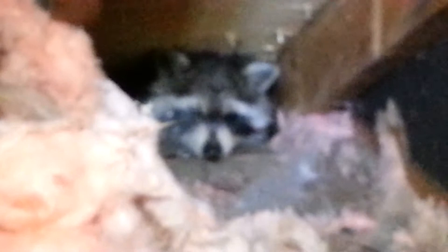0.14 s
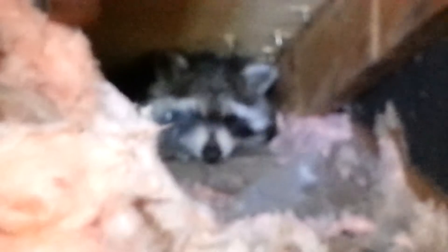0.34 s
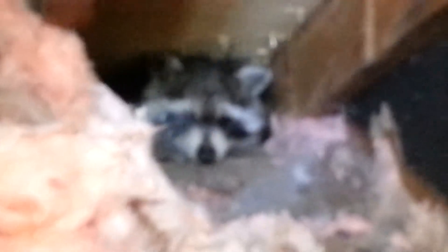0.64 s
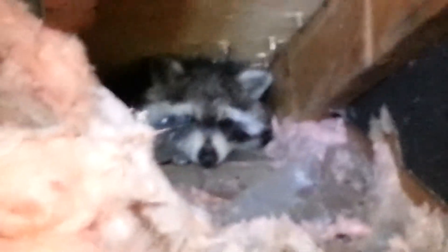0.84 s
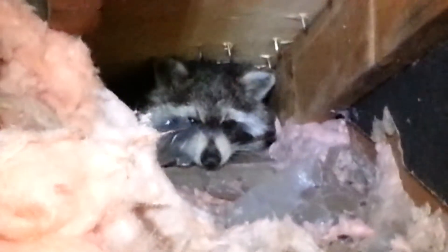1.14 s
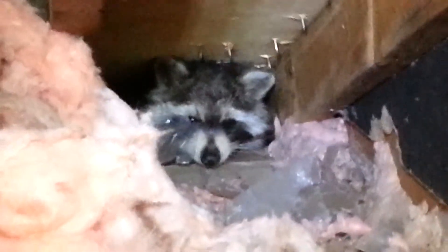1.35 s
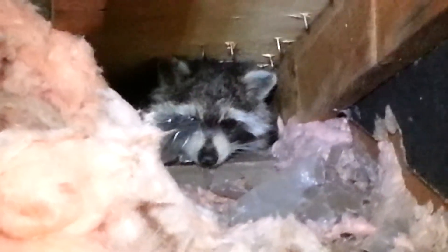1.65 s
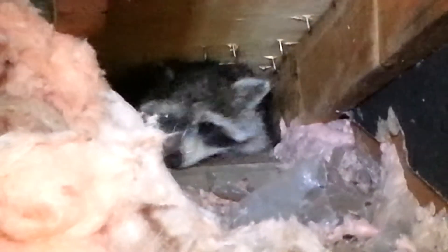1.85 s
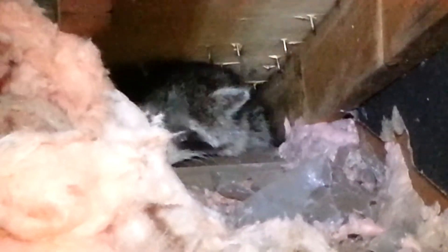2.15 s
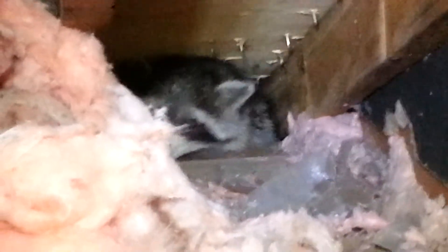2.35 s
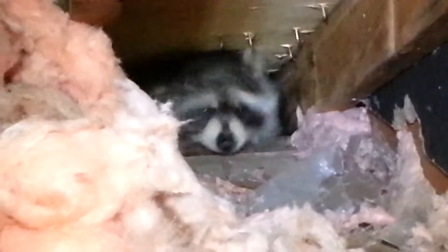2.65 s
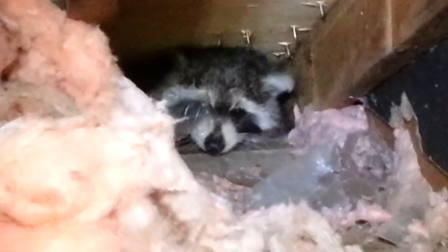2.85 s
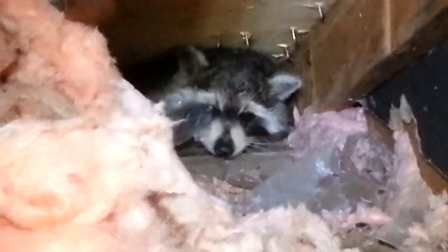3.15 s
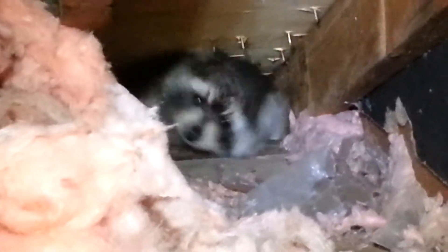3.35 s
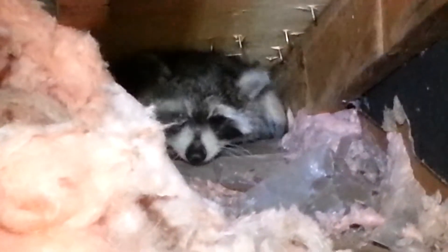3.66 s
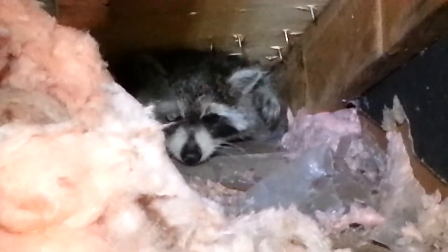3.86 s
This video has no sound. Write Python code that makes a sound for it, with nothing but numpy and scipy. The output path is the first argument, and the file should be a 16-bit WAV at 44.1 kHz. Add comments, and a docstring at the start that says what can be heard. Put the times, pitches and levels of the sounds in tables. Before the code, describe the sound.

Raccoon chittering in raspy rolling bursts, with thin wavering squeals and a few sharp wood snaps

```python
"""Young raccoons in an attic nook

One raccoon gives five rough, trilled chitter calls: fold pulses through throat resonances.
Another squeals thinly between them, a wavering whistle with overtones.
Wood snaps sharply close by (clicks with bright rattles); insulation rustles (grainy treble noise).
The house hums low under a faint hiss, both shaped noise.
Two microphone ports, the right one nearer the nest.
"""
import sys
import numpy as np
from scipy import signal
from scipy.fft import rfft, irfft, next_fast_len
from scipy.io import wavfile
from scipy.ndimage import map_coordinates

SR = 44100
rng = np.random.default_rng(int(sys.argv[2]) if len(sys.argv) > 2 else 0)


def pcm_store(signal):
    """Save signal as 16-bit PCM."""
    levels = np.round(np.clip(np.atleast_2d(signal), -1, 1) * 32767)
    wavfile.write(sys.argv[1], SR, levels.astype(np.int16).T)


N = 176400  # samples: 4 s


def amp(db):
    """Amplitude factor of a level in dB."""
    return 10 ** (np.asarray(db) / 20)


def unit(x):
    """x scaled to rms 1."""
    return x / np.sqrt(np.mean(x ** 2) + 1e-20)


def along(points, hz):
    """Read a table of (f/Hz, value) on a log frequency axis."""
    f, value = np.transpose(points)
    return np.interp(np.log(hz + 1), np.log(f + 1), value)


def curves(rows):
    """One value per sample for each column after the time."""
    s, *columns = np.transpose(rows)
    return [np.interp(np.arange(N) / SR, s, column) for column in columns]


def during(rows, fade):
    """1 within the time span of a table, fading at its ends."""
    t = np.arange(N) / SR
    return np.clip(np.minimum(t - rows[0][0], rows[-1][0] - t) / fade, 0, 1)


def wobble(rate):
    """A smooth random curve with rate knots a second."""
    knots = rng.standard_normal(int(N * rate / SR) + 4)
    return map_coordinates(knots, [np.arange(N) * rate / SR])


def filtered(x, response):
    """x through a complex response of frequency, padded against wrap-around."""
    m = next_fast_len(N + SR // 2)
    return irfft(rfft(x, m) * response(np.fft.rfftfreq(m, 1 / SR)), m)[..., :N]


# Throat resonances: f/Hz, width/Hz, level/dB
THROAT = [(448, 126, -1), (922, 180, -2.5), (1283, 95, 5.5), (1937, 255, 4), (2774, 450, -2),
          (3304, 327, 0), (3957, 590, -16.5), (7160, 980, -28.5)]
# Mouth opening, one row per call: boost under 1050 Hz/dB, boost over 2900 Hz/dB
MOUTH = [(-4, 0), (-6.5, -1), (-5.5, -1), (-1.5, -1), (-3, 2.5)]
JAW_RATE, JAW_SHIFT = 25.084, 0.025  # knots/s; shift of the resonances each way, as a fraction
CHEST_DB = 3.5  # flicker of the lowest resonances
# Between these levels, softer syllables keep more of their rasp (exponent BRIGHTEN)
LOUD_DB, SOFT_DB, BRIGHTEN = -38, -52, .6
# Chitter syllables, one table per call; pitch and roughness before the bends, level before the swell:
# start t/s, end t/s, level/dB, pitch f/Hz, roughness/0-1
CHITTER_CALLS = [
    [(.19, .247, -45, 662, 0.66), (.272, .303, -41.5, 887.4, 0.23), (.337, .374, -39.5, 889, 0.34),
     (.394, .44, -39, 886, 0.25), (.474, .565, -43, 651.5, 0.49), (.574, .619, -38.5, 670.4, 0.65),
     (.628, .675, -40, 638, 0.29), (.68, .702, -37, 445, 0.01)],
    [(.85, .945, -53.5, 522.3, 0.78), (.955, 1.004, -37, 541.4, 0.35), (1.033, 1.064, -40, 497.2, 0.87),
     (1.108, 1.138, -32.5, 632, 0.27), (1.168, 1.225, -34, 658, 0.6), (1.231, 1.287, -35, 642.7, 0.33),
     (1.295, 1.372, -36, 640.7, 0.32), (1.385, 1.452, -32.5, 675, 0.32), (1.465, 1.523, -39, 610, .15)],
    [(1.56, 1.675, -54, 549, 0.91), (1.79, 1.872, -43.5, 599.5, .7), (1.903, 1.94, -36, 609.4, 0.52),
     (1.965, 2.008, -36, 562.4, 0.56), (2.04, 2.092, -37.5, 567.6, 0.64), (2.112, 2.195, -37, 646, 0.38),
     (2.205, 2.25, -35.5, 607.5, 0.23), (2.258, 2.365, -40, 616, 0.72), (2.385, 2.436, -39.5, 654, 0.5),
     (2.452, 2.489, -41, 610, .12)],
    [(2.808, 2.838, -49.5, 543, 0.32), (2.862, 2.922, -39.5, 596, 0.48), (2.932, 2.966, -37.5, 535, 0.3),
     (2.99, 3.035, -38, 628.4, 0.42), (3.06, 3.122, -36, 590.3, 0.33), (3.132, 3.28, -40.5, 624.8, 0.64),
     (3.29, 3.332, -44, 522.5, 0.37)],
    [(3.43, 3.47, -52.5, 579, 0.63), (3.58, 3.63, -38.5, 522.6, 0.67), (3.645, 3.82, -47.5, 572.8, 0.74)],
]


def ring(f, low_hz, high_hz):
    """Complex response of the throat resonances centred in a band, with alternating sign."""
    total = 0
    for k, (centre, width, db) in enumerate(THROAT):
        if low_hz < centre < high_hz:
            damping = 1j * f * width
            total = total + (-1) ** k * amp(db) * damping / (centre * centre - f * f + damping)
    return total


def throat(f):
    """Three bands of throat response, thinned below 300 Hz."""
    bands = np.array([ring(f, 0, 1050), ring(f, 1050, 2900), ring(f, 2900, SR)])
    return f ** 3 / (f ** 3 + 300 ** 3) * bands


def chitter():
    """The folds sound through the throat, whose resonances slide as the jaw moves."""
    calls = [syllables(rows) for rows in CHITTER_CALLS]
    gains, pitches, roughs = np.transpose(calls, (1, 0, 2))
    call, now = gains.argmax(axis=0), np.arange(N)  # the strongest call rules each moment
    source = folds(pitches[call, now], roughs[call, now])
    jaw = (1 + np.tanh(wobble(JAW_RATE))) / 2  # 0 shut, 1 wide
    shut = filtered(source, lambda f: throat(f * (1 + JAW_SHIFT)))
    wide = filtered(source, lambda f: throat(f * (1 - JAW_SHIFT)))
    # the names shut and wide follow lower and higher resonances
    low, middle, top = jaw * wide + (1 - jaw) * shut
    low_db, top_db = np.transpose(MOUTH)[:, call]
    gain = gains.sum(axis=0)
    rasp = (amp(LOUD_DB) / np.clip(gain, amp(SOFT_DB), amp(LOUD_DB))) ** BRIGHTEN
    voice = amp(low_db + CHEST_DB * wobble(45)) * low + middle + amp(top_db) * rasp * top
    return gain * voice / np.std(middle)


ATTACK_S, RELEASE_S = 0.0087, 0.005  # time constants of the syllable edges
SWELL_DB = 2  # rise over one syllable length
SCOOP, SAG, LAST_SAG, FRAY = .1, .11, .34, .7  # bend strengths; the last syllable drops further


def syllables(rows):
    """Gain, pitch and roughness of a call: syllables swell, scoop up, sag; all but the last fray."""
    start, end, db, hz, rough = (column[:, None] for column in np.transpose(rows))
    t = np.arange(0, N, 32) / SR
    u = np.clip((t - start) / (end - start), -.5, 1.5)  # 0 at the start, 1 at the end
    edge = lambda x: 1 / (1 + np.exp(-np.clip(x, -30, 30)))
    gain = amp(db + SWELL_DB * (u + 1.0)) * edge((t - start) / ATTACK_S) * edge((end - t) / RELEASE_S)
    share = gain / gain.sum(axis=0)
    scoop = SCOOP * np.clip(.3 - u, 0, 1) * 2
    sag = np.where(end == end[-1], LAST_SAG, SAG) * np.clip(u - .4, 0, 1) * 2
    pitch = hz * (1 - scoop - sag)
    frayed = np.clip(rough + FRAY * (end < end[-1]) * np.clip(u - .6, 0, 1) * 2, 0, 1)
    whole_call = gain.sum(axis=0), (share * pitch).sum(axis=0), (share * frayed).sum(axis=0)
    return [np.interp(np.arange(N) / SR, t, curve) for curve in whole_call]


# With roughness: pulse timing in cycles, pitch wander, pulse size/dB, breath; SLIDE acts always
JITTER, WANDER, SIZE_DB, BREATH, SLIDE = .16, .13, 4, .55, .035


def folds(pitch, rough):
    """Vocal-fold pulses, from steady to chaotic, with breath noise bursting once a cycle."""
    unsteady = np.exp(WANDER * rough * wobble(70) + SLIDE * wobble(30))
    phase = np.cumsum(pitch * unsteady) / SR  # cycles
    at = np.interp(np.arange(1, int(phase[-1])), phase, np.arange(N))  # pulse times in samples
    whole = at.astype(int)
    luck = rng.standard_normal((N // 30, 2))[:len(at)]
    at = np.clip(at + JITTER * rough[whole] * luck[:, 0] * SR / pitch[whole], 0, N - 2)
    size = amp(SIZE_DB * rough[whole] * luck[:, 1])
    whole, part = at.astype(int), at % 1
    # each pulse is shared between its two neighbouring samples
    pulses = np.bincount(whole, size * (1 - part), N) + np.bincount(whole + 1, size * part, N)
    breath = rng.standard_normal(N) * np.exp(-3 * (phase % 1))
    return unit(pulses - pulses.mean()) + BREATH * rough * unit(breath)


# Squeals, one table each, before quaver, flicker and colour: t/s, pitch f/Hz, level/dB
SQUEALS = [
    [(.1, 1280, -61), (.2, 1400, -63)],
    [(.845, 1500, -57), (.95, 1432, -52)],
    [(1.56, 1480, -56), (1.645, 1400, -56), (1.69, 1650, -58)],
    [(1.705, 1740, -54), (1.735, 1407, -47.5), (1.8, 1740, -54)],
    [(2.49, 1500, -55), (2.56, 1630, -58), (2.61, 1420, -57), (2.7, 1430, -53)],
    [(2.755, 780, -62), (2.815, 1100, -58)],
    [(3.35, 2250, -55), (3.375, 1850, -57), (3.42, 1600, -59), (3.49, 1554, -59)],
    [(3.675, 1260, -49), (3.755, 1550, -46), (3.835, 1330, -49)],
    [(3.86, 1590, -60), (3.91, 1500, -60)],
    [(3.925, 980, -58), (3.98, 950, -58), (4.01, 700, -60)],
]
# Colour of a squeal's partials: f/Hz, level/dB
WHISTLE = [(900, -7), (1600, 0), (3300, -6), (4200, -30)]
QUAVER, FLICKER_DB, FADE_S = .022, 3, .008  # pitch fraction, level wobble, end fades


def squeals():
    """A quavering whistle: a fundamental and two overtones, coloured by frequency."""
    out = np.zeros(N)
    quaver = np.exp(QUAVER * wobble(150))
    flicker = amp(FLICKER_DB * wobble(56))
    for rows in SQUEALS:
        pitch, db = curves(rows)
        angle = 2 * np.pi * np.cumsum(pitch * quaver) / SR
        partials = 0
        for k in (1, 2, 3):
            partials = partials + amp(along(WHISTLE, k * pitch)) * np.sqrt(2) * np.sin(k * angle)
        out += amp(db) * during(rows, FADE_S) * partials
    return out * flicker


# Balance of the nest at the ports: f/Hz, left over right level/dB
SIDES = [(400, -3), (2400, 2), (4400, -5.5), (8000, 9.5)]
LEFT_LAG_S = 0.00018
NOOK_DB, NOOK_T60 = -9, .03  # echo level; s to fall 60 dB


def nook(x):
    """Voices reach the right port first; the boards add a short, different echo at each port."""
    half = np.array([[.5], [-.5]])  # left, right
    lag = lambda hz: np.exp(-2j * np.pi * hz * half * LEFT_LAG_S)
    direct = filtered(x, lambda hz: amp(half * along(SIDES, hz)) * lag(hz))
    t = np.arange(SR // 8) / SR
    tail = rng.standard_normal((2, len(t))) * amp(-60 * t / NOOK_T60)
    tail = tail / np.linalg.norm(tail[0])
    late = np.pad(x, (60, 0))[None]  # the echo starts 60 samples later
    return direct + amp(NOOK_DB) * signal.fftconvolve(late, tail, axes=1)[:, :N]


# Wood snaps close to the microphone: t/s, level/dB, left over right level/dB, f/Hz, left lag/ms
SNAPS = [(0.788, -30, -13.5, 2680, 0.7), (2.7139, -4, 2.5, 5696, 0.0033), (3.531, -2, 6.5, 5230, 0.045),
         (3.5331, -3.5, -3, 4282, 0.013)]
# Rattle colour for a 5000 Hz snap, moved with the snap's pitch: f/Hz, relative level per Hz/dB
RATTLE = [(1500, -18.5), (3500, -5), (8000, -8), (9000, -25)]
SNAP_CYCLES, RATTLE_DB, RATTLE_T60 = 0.95, -12.5, 0.019  # cycles; dB against the click; s


def snaps():
    """A click of a cycle or two and a short bright rattle of decaying noise."""
    out, t = np.zeros((2, N + SR)), np.arange(SR // 20) / SR
    for s, db, pan_db, hz, lag_ms in SNAPS:
        u = t * hz / SNAP_CYCLES
        click = u * np.exp(1 - u ** 2) * np.sin(2 * np.pi * hz * t)
        colour = amp(along(RATTLE, np.fft.rfftfreq(len(t), 1 / SR) * 5000 / hz))
        noise = unit(irfft(rfft(rng.standard_normal((2, len(t)))) * colour, len(t)))
        noise = unit(noise + noise[0])  # the ports share part of the noise
        rattle = amp(RATTLE_DB - 60 * t / RATTLE_T60) * np.minimum(u, 1) * noise
        for side, sign in enumerate((1, -1)):
            start = round((s + lag_ms / 1000 * (sign > 0)) * SR)
            out[side, start:start + len(t)] += amp(db + sign * pan_db / 2) * (click + rattle[side])
    return out[:, :N]


# Likeness of the two ports in the noises: f/Hz, correlation/0-1
ALIKE = [(60, 0.34), (1000, 0.31)]


def hush(spectrum):
    """Stereo noise of rms 1, shaped by a table and partly alike at both ports."""
    def mid_side(hz):
        turn = np.arccos(np.clip(along(ALIKE, hz), -1, 1)) / 2
        colour = amp(along(spectrum, hz)) * (hz >= spectrum[0][0])  # silent below the first row
        return colour * [np.cos(turn), np.sin(turn)]

    mid, side = filtered(rng.standard_normal((2, N)), mid_side)
    return unit(np.array([mid + side, mid - side]))


# Rustle level before the grains: t/s, level/dB
RUSTLE = [(.1, -93.5), (3.5, -73.5), (3.56, -53), (3.76, -54), (3.79, -69)]
# Crackles in the rustle: t/s, peak of the added level/dB
CRACKLES = [(2.595, -39.5), (3.4391, -48), (3.74, -44)]
# Colour of the insulation fibres: f/Hz, relative level per Hz/dB
FIBRES = [(6000, -11), (7700, 2), (9200, -3), (12800, -4)]
CRACKLE_S, GRAINS_DB = 0.0024, -1.5  # rise and fall constant; depth of the grains


def rustle():
    """Grainy treble of shifting insulation, with a few crackles."""
    t = np.arange(N) / SR
    level = amp(curves(RUSTLE)[0] + GRAINS_DB * wobble(360))
    for s, db in CRACKLES:
        level = level + amp(db) * np.exp(-np.abs(t - s - CRACKLE_S) / CRACKLE_S)
    return level * hush(FIBRES)


# House noise before its slow wobble: t/s, level/dB
HUM = [(.15, -58.5), (1.1, -53.5), (3.75, -52.5), (3.87, -58)]
# Colour of the house hum and hiss: f/Hz, relative level per Hz/dB
HOUSE = [(142, -12.5), (1150, -19), (6040, -32.5), (14600, -31.5)]


def house():
    """Low hum and faint hiss of the house: shaped noise of slowly wavering level."""
    hum_db = curves(HUM)[0] + 1.5 * wobble(6)
    return amp(hum_db) * hush(HOUSE)


# Colour of the steady bass: f/Hz, relative level per Hz/dB
RUMBLE = [(25, -35), (85, 1.5), (200, -12), (500, -62)]


def rumble():
    """Steady bass noise beneath everything, at -66 dB."""
    return amp(-66) * hush(RUMBLE)


def scene():
    """The voices in their nook, the snaps, the rustle and the house at both ports."""
    return nook(chitter() + squeals()) + snaps() + rustle() + house() + rumble()


def record(dry):
    """Microphone chain: soft clipping at full scale, then sharp limits at 30 Hz and 14.7 kHz."""
    clipped = dry / (1 + np.abs(dry) ** 8) ** (1 / 8)
    return filtered(clipped, lambda hz: (hz > 30) * (hz < 14700))


dry = scene()
out = record(dry)
pcm_store(out)
```